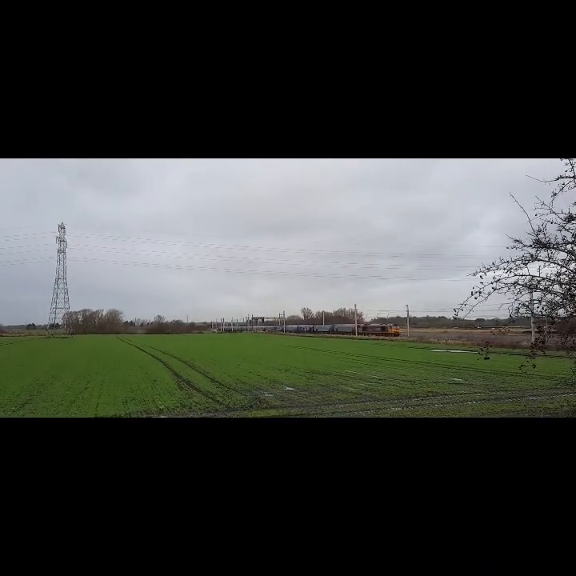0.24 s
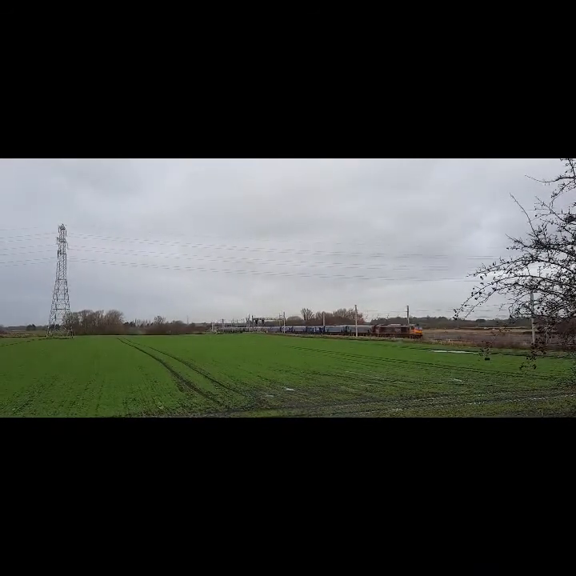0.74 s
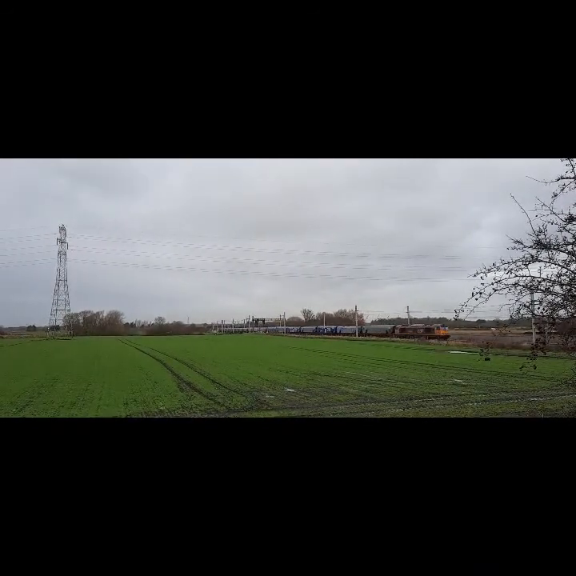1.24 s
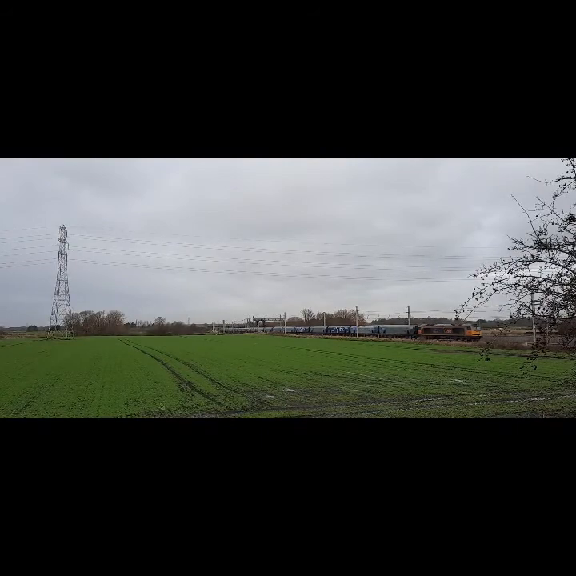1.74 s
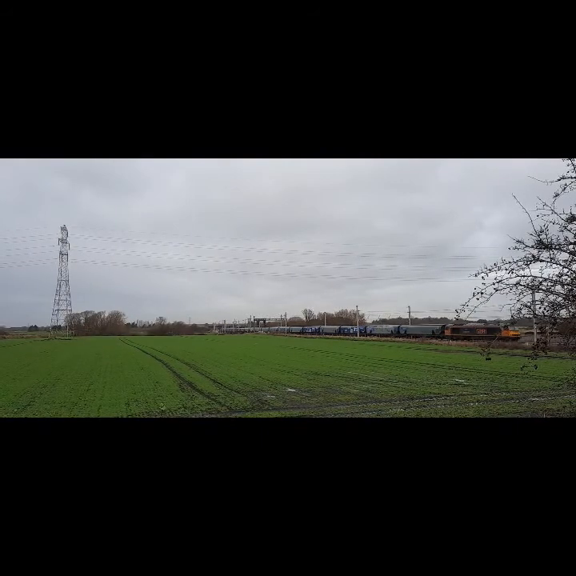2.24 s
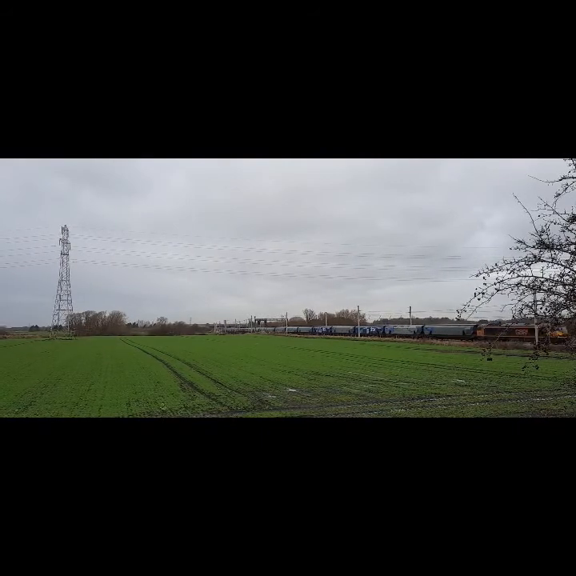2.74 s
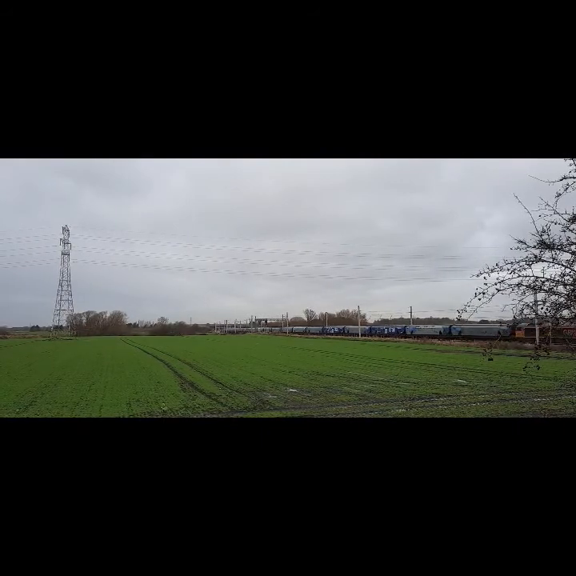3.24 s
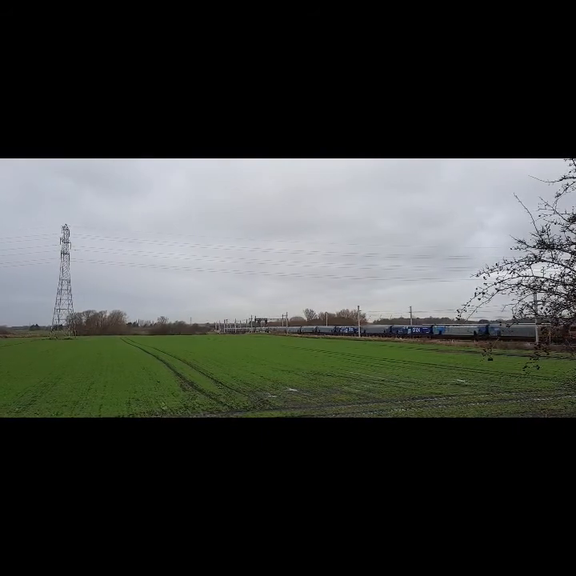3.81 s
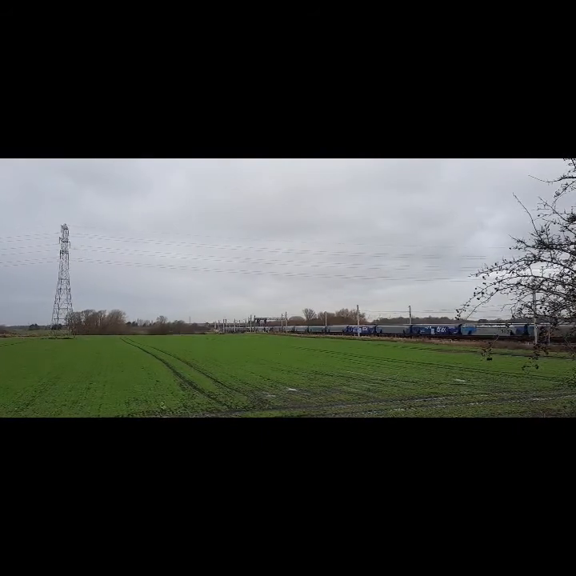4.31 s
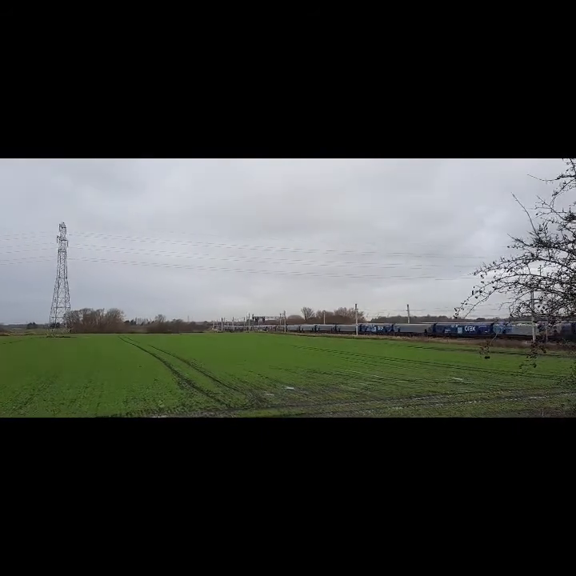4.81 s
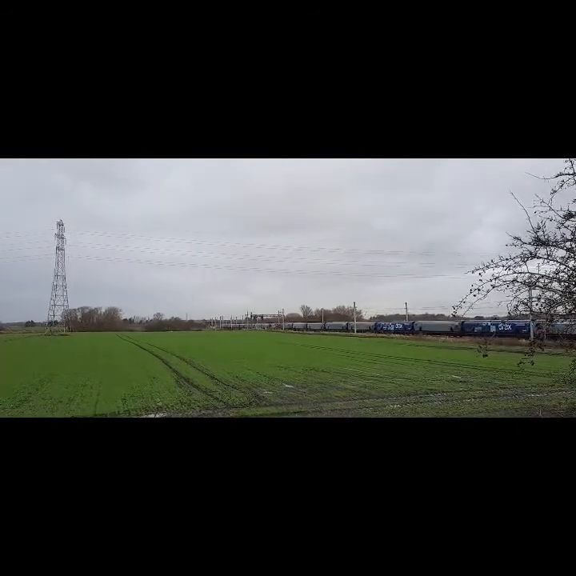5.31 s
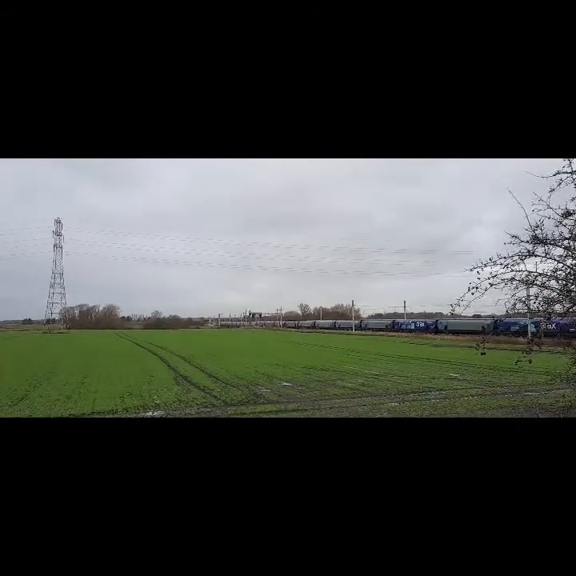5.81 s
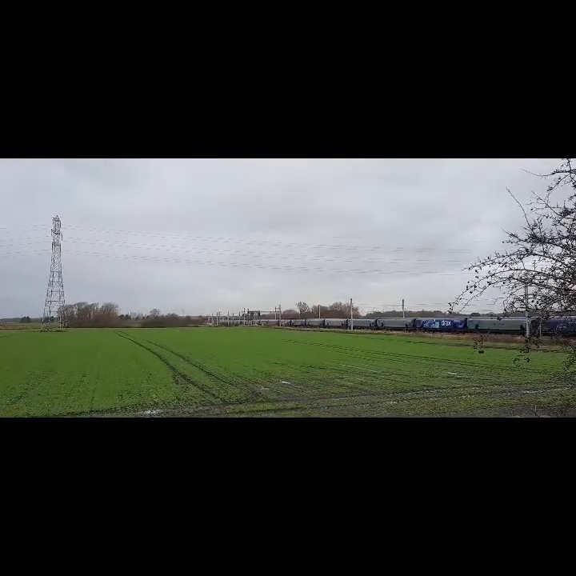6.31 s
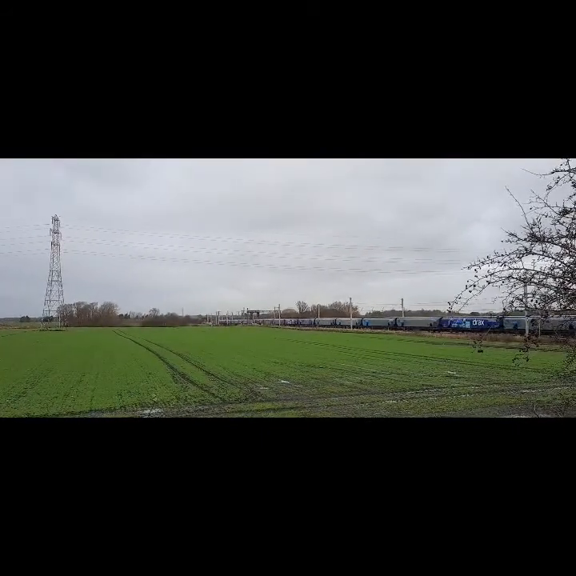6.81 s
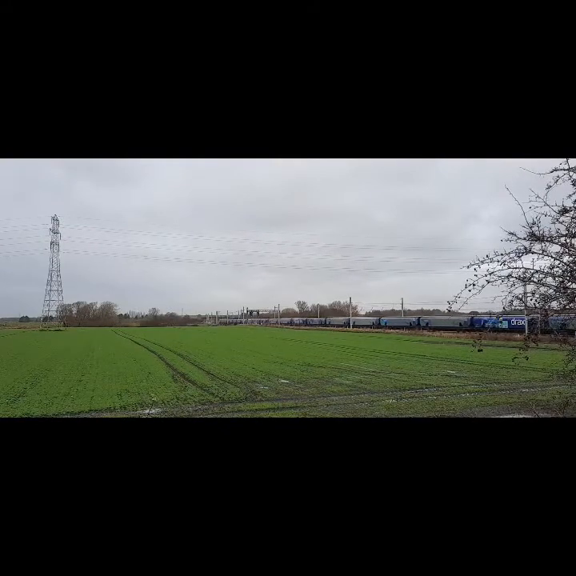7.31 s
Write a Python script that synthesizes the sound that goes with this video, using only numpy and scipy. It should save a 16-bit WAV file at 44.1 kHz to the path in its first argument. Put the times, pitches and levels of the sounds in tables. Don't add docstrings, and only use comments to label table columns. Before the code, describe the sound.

Outdoors beside an open field, a diesel locomotive hauls freight wagons past in the distance. Its low drone throbs rapidly, about eight beats a second, with breathy exhaust and fan roar and faint wavering whines. Soft, steady wagon rumble and hiss lie beside it. Around six seconds the engine becomes shadowed and drops, leaving mostly rolling wheels. A distant stereo microphone hears it slightly left-heavy, with no close clatter.

```python
import sys
import numpy as np
from scipy import signal
from scipy.io import wavfile
from scipy.ndimage import uniform_filter1d

SR = 44100
rng = np.random.default_rng(int(sys.argv[2]) if len(sys.argv) > 2 else 0)


def pcm_store(signal):
    levels = np.round(np.clip(np.atleast_2d(signal), -1, 1) * 32767)
    wavfile.write(sys.argv[1], SR, levels.astype(np.int16).T)


def gain_from_db(level_db):
    decades = np.asarray(level_db, float) / 20
    return 10 ** decades


N = 332955
HOP = 256
TIME = np.arange(N) / SR
FRAMES = np.arange(N // HOP + 5) * HOP / SR
HZ = np.fft.rfftfreq(1024, 1 / SR)[:, None]
BINS = 220

# t/s, rate/(cycles/s)
CYCLE_RATE = [(0, 8.133), (1, 8.104), (2, 8.071), (3, 8.019), (4, 7.961), (4.7, 7.907), (5.4, 7.836),
              (6, 7.72), (6.6, 7.65), (7.55, 7.56)]
CRANK_START = -.3
# t/s, locomotive lag/ms, mid-wagon lag/ms
BEARING = [
    (0, -0.0042, -0.083),
    (2, 0.099, 0.04),
    (3.5, 0.14, 0.076),
    (4.2, 0.24, 0.093),
    (5.5, 0.28, 0.088),
    (7.55, 0.42, 0.11),
]


def evened(x):
    return x / np.sqrt(np.mean(x ** 2) + 1e-20)


def colour(points):
    f, value = np.transpose(points)
    return np.interp(np.log(HZ + 1), np.log(f + 1), value)


def curves(rows, t):
    s, *columns = np.transpose(rows)
    return [np.interp(t, s, c) for c in columns]


def spectrogram(x):
    return signal.stft(x, nperseg=1024, noverlap=768)[2]


def waveform(z):
    return signal.istft(z, nperseg=1024, noverlap=768)[1][:, :N]


def wander(per_s, n):
    hz = np.geomspace(per_s / 8, per_s, 16)[:, None]
    waves = np.sin(2 * np.pi * (hz * FRAMES + rng.random((n, 16, 1))))
    return evened((waves / np.sqrt(hz)).sum(1))


def swell(t, s, half):
    return np.exp(-((t - s) / half) ** 2)


def field(spectrum, patchy_db):
    patches = rng.standard_normal((len(FRAMES), len(HZ))).T
    patches = uniform_filter1d(patches, size=10, axis=0)
    patches = evened(uniform_filter1d(patches, size=20, axis=1))
    shape = gain_from_db(colour(spectrum) + patchy_db * patches)
    return shape / np.sqrt(1.72 * np.mean((shape ** 2).sum(0)))


def chance():
    a, b = rng.standard_normal((len(FRAMES), len(HZ), 2)).T
    return a + 1j * b


def noise(magnitude):
    # f/Hz, share/1
    scatter = [(100, .06), (300, .12), (600, .28), (1500, .28), (4000, .38), (8000, .7)]
    share = np.clip(colour(scatter), 0, 1)
    shared = magnitude * np.sqrt(1 - share ** 2) * chance()
    scattered = magnitude * share * np.array([chance(), chance()])
    return shared, scattered


def ports(shared, scattered, lag_ms):
    # delay/ms, drift/(ms per ms of lag), gain/1, gain change/(1 per ms of lag)
    left_echoes = [(0.267, -0.36, 0.16, -0.5), (0.45, 0.922, -0.14, -0.015), (0.539, -0.012, 0.11, -0.23),
                   (0.673, 0.37, -0.13, 0.42), (0.79, 0.37, 0.17, -0.033), (1.074, -0.47, 0.11, 0.32),
                   (1.234, -0.66, -0.19, 0.271), (1.58, -0.21, 0.13, -0.925), (1.726, -0.413, -0.1, 0.408),
                   (1.997, 0.008, 0.065, 0.31)]
    right_echoes = [(0.199, -0.042, 0.17, -0.33), (0.439, 0.65, -0.25, 1.36), (0.683, 0.25, -0.11, -0.68),
                    (1.007, 0.143, 0.2, -1.5), (1.109, 0.2, 0.51, 0.23), (1.257, -0.073, -0.27, 1.054),
                    (1.687, 0.26, -0.078, 0.441), (1.813, 1, -0.18, 0.4), (2.257, 0.5, 0.015, -0.039)]
    # f/Hz, change/(dB per ms of lag)
    body_shade = [(500, -1), (900, -1), (1400, -26), (1900, -25), (2500, -7), (4000, 1), (8000, 1.5)]
    hz = HZ[:BINS]
    lag_ms = lag_ms[::8]
    turn = np.minimum(lag_ms, .16)

    def delay(ms):
        return np.exp(-2j * np.pi * hz * ms / 1000)

    def body(echoes):
        return 1 + sum((gain + fade * turn) * delay(ms + drift * turn) for ms, drift, gain, fade in echoes)

    shade = gain_from_db(colour(body_shade)[:BINS] * np.maximum(lag_ms, 0))
    front = np.array([body(left_echoes) * delay(lag_ms), body(right_echoes) * shade])
    front = np.repeat(front, 8, axis=2)[..., :len(FRAMES)]
    return (shared[:BINS] + scattered[:, :BINS]) * front


def wagons():
    # f/Hz, level/dB
    rolling = [(40, -10.5), (150, 2), (300, 2), (530, -5.5), (1100, -12), (2000, -10.5), (3000, -17.5),
               (4000, -19), (5000, -26.5), (7000, -29), (7800, -38), (8600, -44)]
    # centre t/s, half length/s, extra treble slope/(dB/octave)
    nearest = (3.3, 0.67, 1.2)
    spread_ms = .018
    far = np.exp(-FRAMES / 1)
    db = -54.5 - 3.5 * far - 0.41 * np.maximum(FRAMES - 3.5, 0)
    tilt_db = 2.5 - 6.5 * far + nearest[2] * swell(FRAMES, *nearest[:2])
    level = gain_from_db(db + 18.5 + tilt_db * np.log2(np.maximum(HZ / 2000, 1)))
    swell_db = .3 * wander(18.0, 1) + 0.92 * wander(6.2, 3)
    lag_ms = curves(BEARING, FRAMES)[1]
    total = 0
    for side, stretch_db in zip((-1, 0, 1), swell_db):
        shared, scattered = noise(level * gain_from_db(stretch_db) * field(rolling, patchy_db=0.26))
        total = total + ports(shared, scattered, lag_ms + side * spread_ms)
    return total


def heard(row, t):
    # t/s, nearness/dB, bank shadow/1
    passage = [(0, -1, 0.02), (.5, -1.5, 0.17), (1.3, -1.5, 0), (2.2, 0.1, 0.05), (2.8, 0, 0),
               (3.6, 1.5, 0.21), (4.3, 0.36, 0.02), (5.2, 1.2, 0.03), (5.8, 1, .05), (6.1, -0.2, 0.28),
               (6.4, 1.75, 0.56), (6.75, 0.4, 1), (7.1, 0.5, 0.88), (7.35, 0.15, 0.75), (7.55, 0.3, 0.36)]
    db, share, depth_db, early_s = row
    nearness_db = curves(passage, t)[0]
    shadow = np.clip(curves(passage, t + early_s)[1], 0, 1)
    return db + share * nearness_db - depth_db * shadow


def whines():
    # multiple of shaft rate/1, bandwidth/Hz, steady core against fuzz/1
    tones = [(18.5, 5., 2.), (37., 16., 1.1), (116.2, 8., .5), (236.7, 70., 1.0), (316.5, 55., 1.2),
             (436.5, 70., .9)]
    # level/dB, share of nearness/1, shadow depth/dB, shadow lead/s
    steady = [(-48.5, .3, 15, -.2), (-41.5, 3, 4.8, .02), (-57.5, .3, 29, .2), (-51.5, 0.43, 16, .1),
              (-56, .3, 14, .1), (-68, .3, 11, .1)]
    # centre t/s, half length/s, peak level/dB
    surges = [
        [(.6, .45, -32.5), (2.3, .15, -37.5), (3.5, 0.6, -35), (6.05, 0.27, -35.5)],
        [(.03, 0.051, -40.5), (1.8, 0.23, -37.5), (2.75, 0.16, -33), (3.35, .3, -35), (4.05, 0.22, -38),
         (4.85, 0.042, -29), (5.25, .16, -32), (5.85, .1, -29)],
        [(1.25, .4, -52), (2.6, .3, -56), (5., 0.45, -51.5)],
        [(1.3, 0.45, -54), (2.1, 0.37, -43.5), (2.7, 0.49, -49.5), (4.3, .2, -47.5), (5.1, 0.51, -42)],
        [(.6, 0.38, -51), (1.4, .3, -57), (2.16, 0.14, -46), (4.05, 0.097, -52), (4.5, 0.22, -42.5),
         (4.9, 0.15, -45.5), (5.3, .3, -46), (5.7, .1, -45), (6.05, 0.23, -51)],
        [(1.9, .15, -54.5), (2.6, 0.18, -57), (3.1, .25, -48), (3.7, .35, -52.5), (4.54, .05, -48),
         (4.6, 0.22, -54.5)],
    ]
    # t/s, rate/(turns/s)
    gear_rate = [
        (0, 8.1),
        (2.6, 8.085),
        (3.4, 8.0),
        (4.1, 7.91),
        (7.55, 7.89),
    ]
    waver = .004
    fan = np.cumsum(curves(CYCLE_RATE, TIME)[0]) / SR
    gear = np.cumsum(curves(gear_rate, TIME)[0]) / SR
    shafts = (fan, gear, fan, gear, gear, gear)
    out = 0
    for (k, width, core), base, events, turns in zip(tones, steady, surges, shafts):
        power = gain_from_db(heard(base, FRAMES)) ** 2
        power = power + sum(gain_from_db(db) ** 2 * swell(FRAMES, s, half) for s, half, db in events)
        r = np.exp(-np.pi * width / SR)
        white = rng.standard_normal(N) + 1j * rng.standard_normal(N)
        fuzz = signal.lfilter([1], [1, -r], white)
        fuzz = evened(fuzz.view(float)).view(complex)
        slip = np.cumsum(8 * waver * wander(12, 1)[0]) * HOP / SR
        turns = turns + np.interp(TIME, FRAMES, slip)
        tone = evened(((fuzz + core) * np.exp(2j * np.pi * k * turns)).real)
        out = out + np.interp(TIME, FRAMES, np.sqrt(power)) * tone
    return out


def roar():
    # f/Hz, level/dB
    low_roar = [(25, -33), (45, -2), (62, -9), (85, -3.5), (150, 3.5), (225, -18), (330, 0), (450, -22),
                (700, -23.5), (9000, -74)]
    upper_roar = [(200, -43.5), (520, -8.5), (800, -0.5), (1200, -0.5), (1600, -10), (2000, -19),
                  (2900, -9), (3700, -24.5), (5000, -20.5), (7000, -31), (9000, -59.5)]
    # level/dB, share of nearness/1, shadow depth/dB, shadow lead/s
    roar_levels = [(-30, 1.96, 9.9, 0.3), (-36, 1.11, 9.8, 0.21)]
    # centre t/s, half length/s, extra level/dB
    flank = (4.1, 0.93, 2.8)
    low_db, upper_db = (heard(row, FRAMES) for row in roar_levels)
    cycles = np.cumsum(curves(CYCLE_RATE, FRAMES)[0]) * HOP / SR + CRANK_START
    throb_db = 0.6 * np.cos(2 * np.pi * cycles)
    flank_db = flank[2] * swell(FRAMES, *flank[:2])
    low = gain_from_db(low_db + 3.0 + throb_db) * field(low_roar, patchy_db=-0.4)
    upper = gain_from_db(upper_db + flank_db + throb_db) * field(upper_roar, patchy_db=-0.38)
    return noise(low + upper)


def engine():
    # rms level/dB, share of nearness/1, shadow depth/dB, shadow lead/s
    strong_rows = [(-29.5, 0.4, 10.5, .01), (-32.5, 0.44, 10, .02), (-39, 0.3, 10.5, .05),
                   (-28, 0.98, 17.5, 0.29)]
    strong_numbers = (7, 8, 13, 15)
    # order/1, level relative to order 15/dB
    weak_rows = [(6, -18), (9, -17), (11, -18), (12, -14), (16, -16), (25, -20)]
    turns = np.cumsum(curves(CYCLE_RATE, TIME)[0]) / SR + CRANK_START
    drift = [np.interp(TIME, FRAMES, w) for w in wander(1.697, len(weak_rows) + len(strong_rows))]
    levels_db = [heard(row, TIME) + .5 * w for row, w in zip(strong_rows, drift[len(weak_rows):])]
    out = 0
    for k, db in zip(strong_numbers, levels_db):
        out = out + gain_from_db(db) * np.cos(2 * np.pi * k * turns)
    for (k, db), w in zip(weak_rows, drift):
        out = out + gain_from_db(levels_db[-1] + db + 2.7 * w) * np.cos(2 * np.pi * (k * turns + rng.random()))
    return -np.sqrt(2) * out


def locomotive():
    shared, scattered = roar()
    tones = spectrogram(np.pad(engine() + whines(), (0, 2048)))[:, :len(FRAMES)]
    return ports(shared + gain_from_db(-0.45) * tones, scattered, curves(BEARING, FRAMES)[0])


def scene():
    # f/Hz, left minus right level/dB
    imbalance = [(40, 5.5), (100, 3.5), (310, 5.), (600, 6), (1500, 5.5), (3000, 2.5), (6000, 0.5),
                 (7000, -0.5), (7600, 3), (8200, 5)]
    z = np.pad(wagons() + locomotive(), ((0, 0), (0, len(HZ) - BINS), (0, 0)))
    half_db = colour(imbalance) / 2
    return waveform(gain_from_db(np.array([half_db, -half_db])) * z)


def band_limit(x):
    return signal.sosfilt(signal.butter(12, 8650, fs=SR, output="sos"), x)


def record(dry):
    # f/Hz, level/dB
    treble_gate = [(6000, -108), (7000, -95), (7600, -88), (8200, -84), (8700, -78)]
    bass_cut = signal.butter(5, 44., "high", fs=SR, output="sos")
    z = spectrogram(signal.sosfilt(bass_cut, dry))
    band = uniform_filter1d(abs(z), size=3, axis=1)
    band = uniform_filter1d(band, size=4, axis=2)
    kept = np.clip(band / gain_from_db(colour(treble_gate)), 0, 1) ** 14
    gated = waveform(z * np.where(HZ > 6000, kept, 1))
    return band_limit(gated)


dry = scene()
out = record(dry)
pcm_store(out)
```